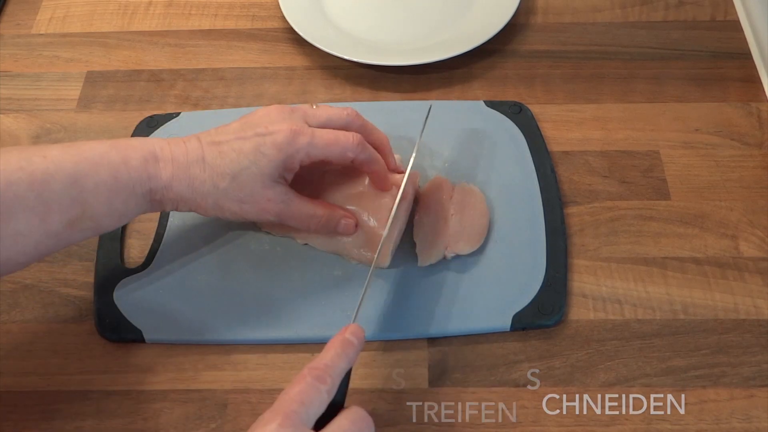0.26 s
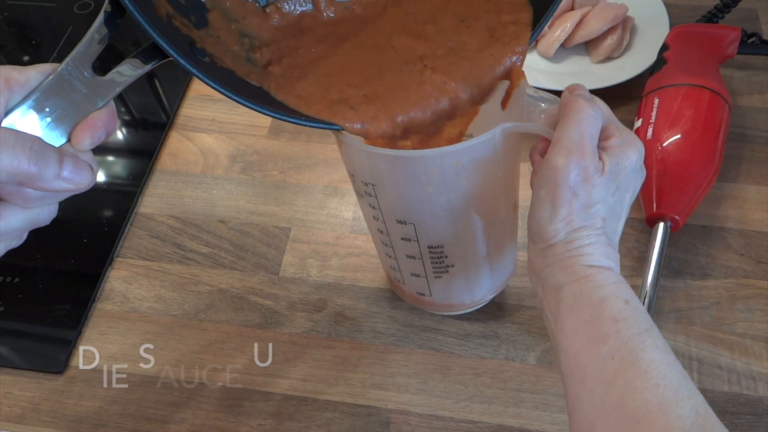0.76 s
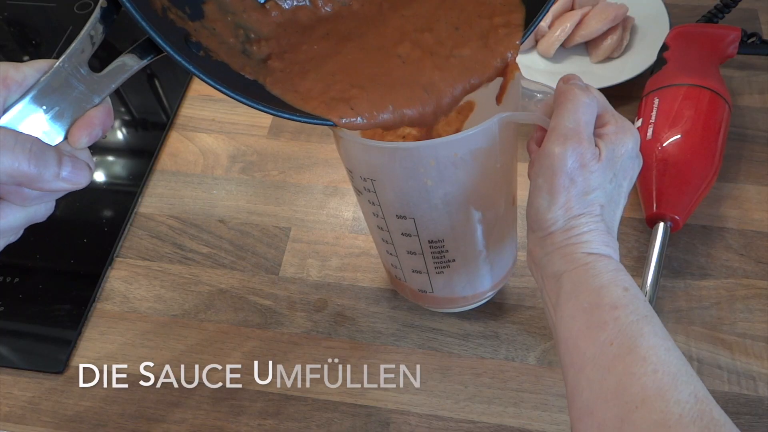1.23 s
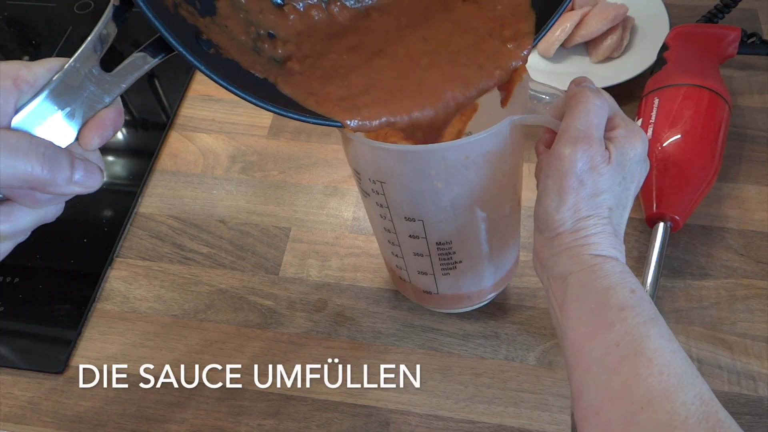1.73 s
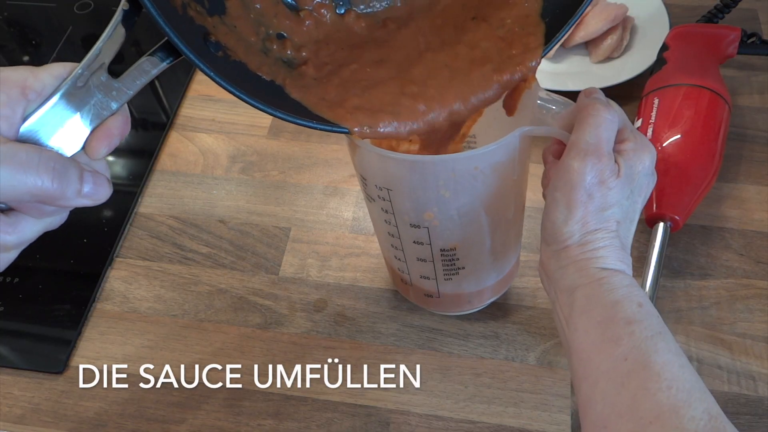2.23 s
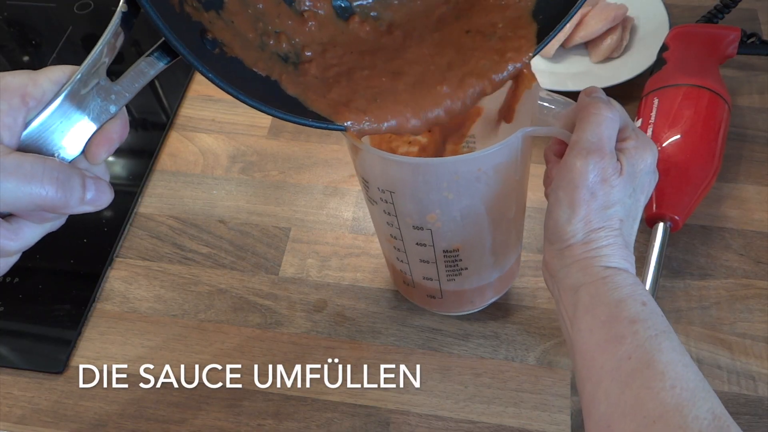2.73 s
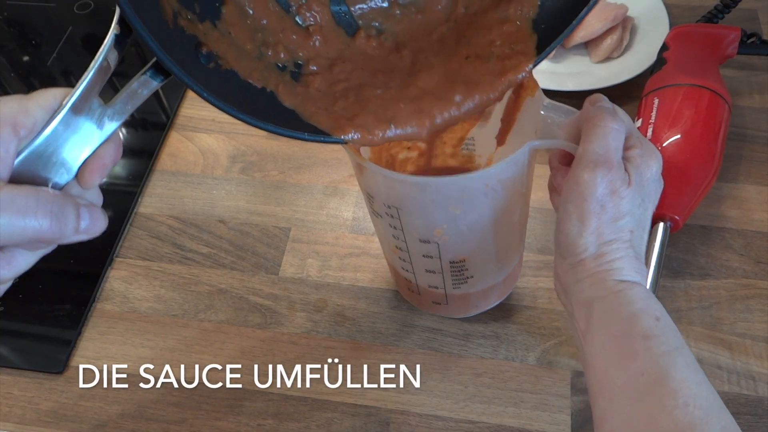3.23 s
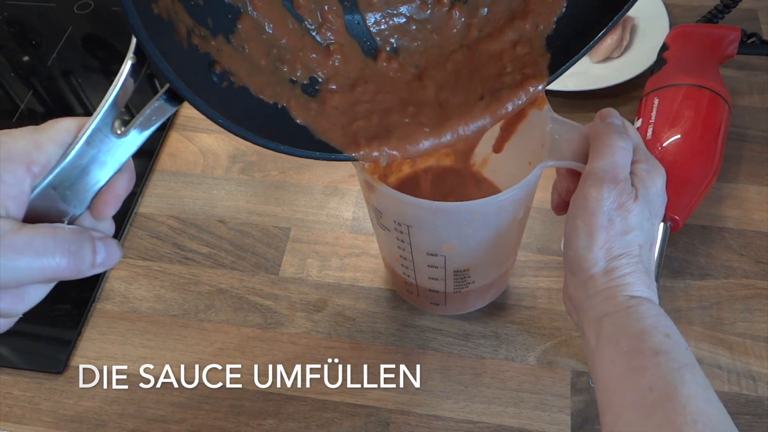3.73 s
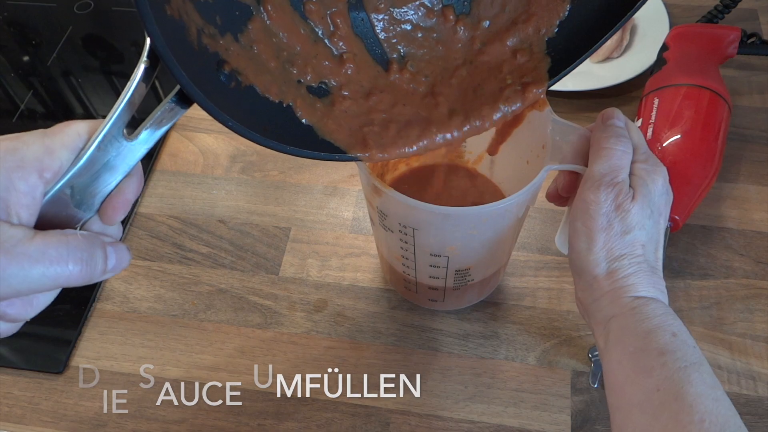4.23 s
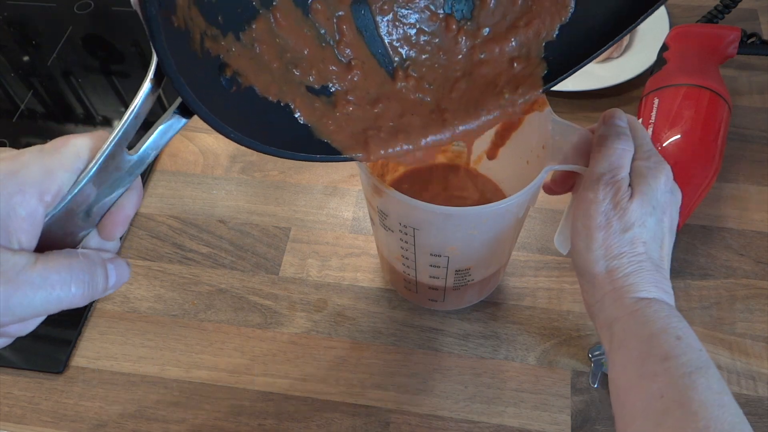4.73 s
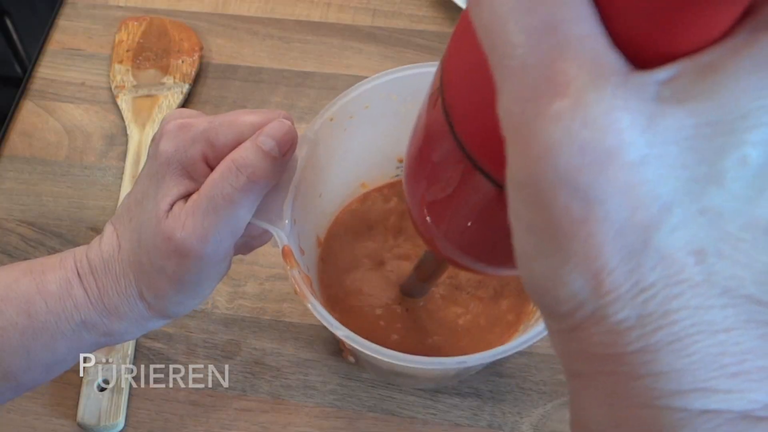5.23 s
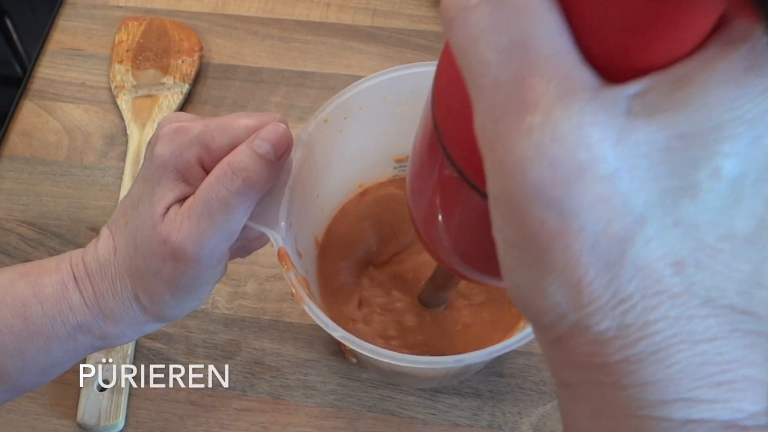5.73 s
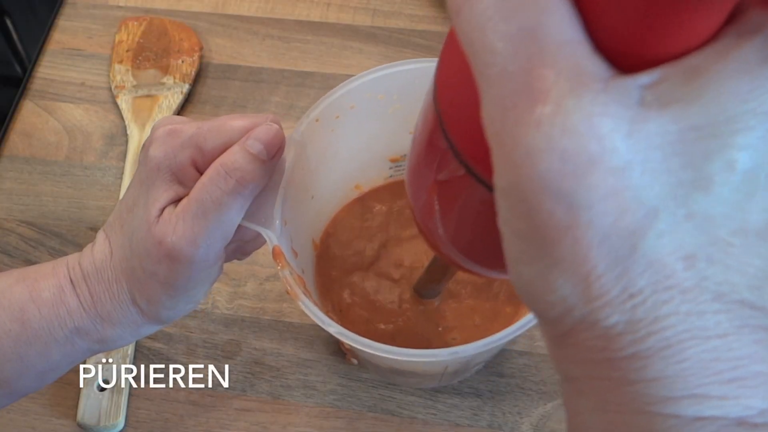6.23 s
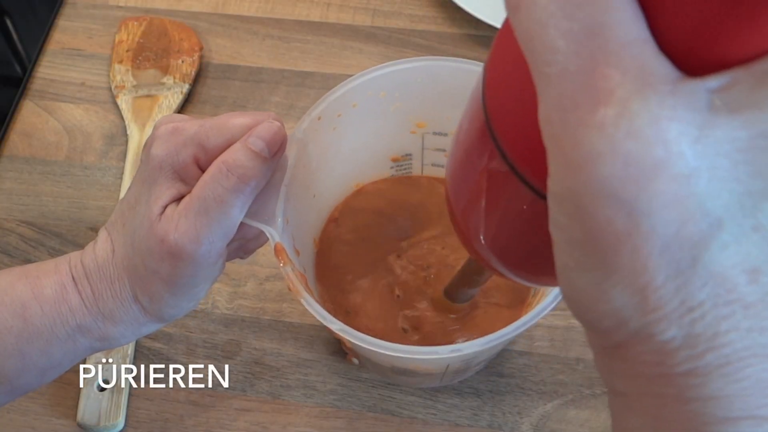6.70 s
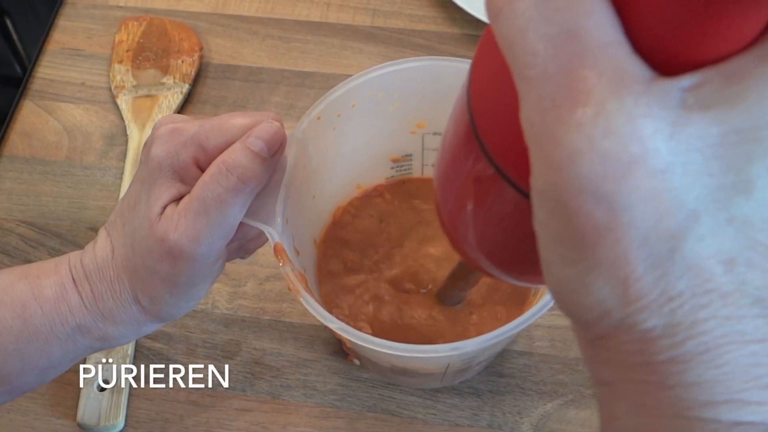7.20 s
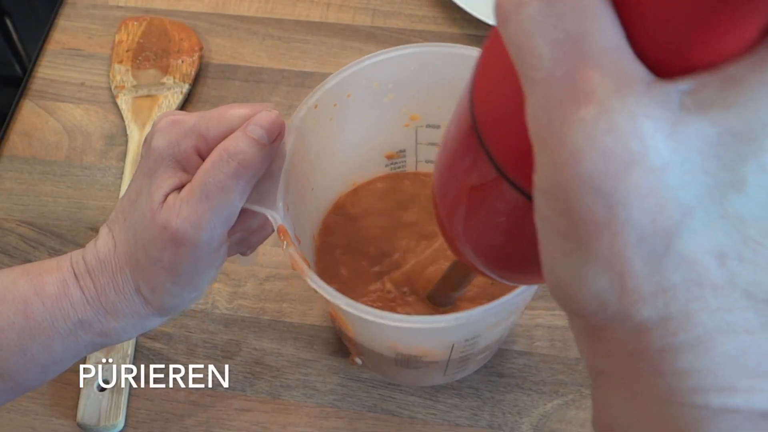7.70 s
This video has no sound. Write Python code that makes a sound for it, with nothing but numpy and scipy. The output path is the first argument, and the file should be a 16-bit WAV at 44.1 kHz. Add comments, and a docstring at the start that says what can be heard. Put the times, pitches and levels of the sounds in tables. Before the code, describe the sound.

A knife softly hisses through meat, thick sauce plops and spatters into a plastic jug, then a loud hand blender abruptly whirs until the end.

```python
"""A knife slides through meat on a cutting board: wet hiss, rubbing and a faint tick are shaped noise.
Thick sauce then drops from a pan into a plastic jug: torn films are noise bursts, air pockets and the pan decaying sines.
Last, a hand blender starts in the jug: filtered clicks churn, rasp and spatter, tones locked to the shaft whine,
and the jug bumps the worktop. All this is heard at arm's length in a small kitchen, with quiet room noise and low tones."""
import sys
import numpy as np
from scipy import signal
from scipy.fft import rfft, irfft
from scipy.io import wavfile
from scipy.ndimage import uniform_filter1d

SR = 44100
rng = np.random.default_rng(int(sys.argv[2]) if len(sys.argv) > 2 else 0)


def store_pcm(level_fs):
    """Save levels as 16-bit WAV."""
    pcm = np.round(np.clip(level_fs, -1, 1) * 32767).astype(np.int16)
    wavfile.write(sys.argv[1], SR, np.atleast_2d(pcm).T)


N = 351036
T = np.arange(N) / SR


def undb(db):
    """Logarithmic level: decibels become an amplitude gain."""
    return 10 ** (np.asarray(db) / 20)


def unit(x):
    """Normalisation: scale to rms 1."""
    return x / np.sqrt(np.mean(x ** 2))


def curves(table):
    """Linear interpolation: each column of a table becomes a line through time."""
    s, *columns = np.transpose(table)
    return [np.interp(T, s, column) for column in columns]


def add(out, s, sound):
    """Superposition: mix a short sound in at time s."""
    i = int(s * SR)
    out[i:i + len(sound)] += sound[:N - i]


def band(x, lo_hz, hi_hz, order=2):
    """Band limitation by a Butterworth band-pass."""
    edges = [lo_hz, min(hi_hz, SR / 2.2)]
    return signal.sosfilt(signal.butter(order, edges, "band", fs=SR, output="sos"), x)


def colour(x, points):
    """Minimum-phase filtering: a causal filter through (Hz, dB) points, from the cepstrum of the gain."""
    size = 2 ** 12
    hz, db = np.transpose(points)
    bin_hz = np.arange(size // 2 + 1) * SR / size
    gain = undb(np.interp(np.log(bin_hz + 1), np.log(hz), db))
    # folding the cepstrum onto positive times makes the filter causal
    cepstrum = irfft(np.log(gain))[:size // 2]
    cepstrum[1:] *= 2
    impulse = irfft(np.exp(rfft(cepstrum, size)))
    return signal.fftconvolve(x, impulse)[:len(x)]


def fade(t, t60):
    """Exponential damping: 60 dB lost in t60 seconds."""
    return np.exp(-np.log(1000) * t / t60)


def ring(modes, t):
    """Modal superposition: damped sines after one blow."""
    return sum(undb(db) * np.sin(2 * np.pi * hz * t) * fade(t, t60) for hz, db, t60 in modes)


def resonate(x, modes):
    """Driven resonance: x excites narrow modes, each as wide as its decay time makes it."""
    out = 0
    for hz, db, t60 in modes:
        half_width_hz = np.log(1000) / (2 * np.pi * t60)
        out = out + undb(db) * unit(band(x, hz - half_width_hz, hz + half_width_hz))
    return unit(out)


def walk(rate):
    """Random modulation: stepped noise, rate steps a second, smoothed twice to rms near 1."""
    k = int(SR / rate)
    steps = np.repeat(rng.standard_normal(N // k + 1), k)
    return unit(uniform_filter1d(uniform_filter1d(steps, k), k)[:N])


def clicks(rate, spread_db):
    """Shot noise: random clicks of uneven size and either sign, rate a second."""
    size = undb(spread_db * np.minimum(rng.exponential(size=N), 5))
    return (rng.random(N) < rate / SR) * size * rng.choice([-1, 1], N)


def blow(x, db):
    """Onset level: give the first 10 ms of a hit the rms level db."""
    return x * undb(db) / np.sqrt(np.mean(x[:SR // 100] ** 2))


def splat(t, lo_hz, hi_hz, t60):
    """Broadband impulse: a decaying noise burst limited to one band."""
    return band(rng.standard_normal(len(t)) * fade(t, t60), lo_hz, hi_hz)


def stroke(s, attack, t60):
    """Attack and decay: an envelope that rises to its peak at time s and dies away."""
    return np.clip(1 + (T - s) / attack, 0, 1) * fade(np.maximum(T - s, 0), t60)


def kitchen(x, t60, wet_db, side_db):
    """Reverberation: direct sound plus a tail from tiles and cupboards, part alike, part opposite left and right."""
    t = T[:SR // 2]
    shape = fade(t, t60) * np.clip((t - .002) / 0.00099, 0, 1)
    mid, side = (band(rng.standard_normal(len(t)), 195, 7400, order=1) * shape for _ in range(2))
    mid, side = (tail / np.sqrt(np.sum(tail ** 2)) for tail in (mid, side))
    side = colour(side, [(300, -6.0), (700, -3.5), (1400, -0.5), (2500, -7), (5000, -14.5), (9000, 2.0)])
    tails = undb(wet_db) * mid + undb(side_db) * side * np.array([[1], [-1]])
    return x + signal.fftconvolve(x[None], tails, axes=1)[:, :N]


def placed(x, pan_db):
    """Interaural level difference: pan_db is left minus right."""
    return x * undb(np.array([[pan_db], [-pan_db]]) / 2)


# spectrum of the quiet kitchen: pitch_hz [Hz], level_db [dB, relative]
HUSH_SPECTRUM = [(25, 6), (50, -12), (85, 0), (130, -5), (180, 0), (260, -3.5), (370, -4), (530, -8.5),
                 (1000, -12.5), (3300, -22.5), (5400, -22), (11000, -31)]
HUSH_DB, HUSH_WANDER_DB = -60, 0.54


def hush():
    """Diffuse background: low room noise, nearly steady, from two independent coloured noises."""
    mid, side = (unit(colour(rng.standard_normal(N), HUSH_SPECTRUM)) for _ in range(2))
    level = undb(HUSH_DB + HUSH_WANDER_DB * walk(6.3))
    return level * (mid + 0.74 * side * np.array([[1], [-1]]))


# pushes of the knife through the meat: start_s [s, moment of the peak], level_db [dB, wet hiss]
KNIFE_PUSHES = [(.015, -61.5), (.1, -66), (.24, -63), (.52, -57.5), (.58, -51.5)]
CUT_ATTACK_S, CUT_T60_S = 0.038, 0.37
# the edge reaches the board and rubs along it; RUB_S is the peak
RUB_S, RUB_DB, RUB_ATTACK_S, RUB_T60_S = 0.461, -51, .025, 0.8


def knife():
    """Friction as shot noise: the blade parts wet meat and its edge rubs along the board."""
    hiss = unit(band(clicks(2500, spread_db=1.5), 3800, 9900, order=1))
    pushes = sum(undb(db) * stroke(s, CUT_ATTACK_S, CUT_T60_S) for s, db in KNIFE_PUSHES)
    rub = unit(band(clicks(1200, spread_db=5.0), 260, 505, order=4))
    return hiss * pushes + rub * undb(RUB_DB) * stroke(RUB_S, RUB_ATTACK_S, RUB_T60_S)


# as the jug fills, its air column shortens and each splash dies sooner
FILL_FROM_S, FILL_TO_S = 1.45, 3.6
EMPTY_RATIO, FULL_RATIO = 1.027, 1.17  # factor on the air column's pitches
EMPTY_T60_S, FULL_T60_S = 0.07, 0.023  # splash decay


def filling(s, empty, full):
    """Changing cavity: a quantity moves from its empty-jug to its full-jug value as the sauce rises."""
    return np.interp(s, [FILL_FROM_S, FILL_TO_S], [empty, full])


# short bright ticks, a faint one of the knife in the meat at .431 s, then wet films bursting:
# start_s [s], centre_hz [Hz], tick_db [dB], slap_db [dB]
BRIGHT_TICKS = [(.431, 6900, -55.5, -59.5), (.647, 7400, -37, -58), (0.865, 8200, -39.5, -54),
                (1.034, 7760, -44.5, -57), (1.165, 5140, -47, -53), (1.189, 7100, -37, -42.5),
                (1.327, 6360, -40, -33), (1.603, 6130, -38.5, -54), (1.748, 6740, -49, -50),
                (2.088, 8000, -35, -62), (2.253, 8000, -44, -70), (2.373, 7300, -40.5, -67),
                (2.578, 7960, -47, -63), (2.642, 7150, -45, -37), (2.725, 8050, -30, -52),
                (3.137, 7940, -30, -40.5), (3.46, 7600, -32, -54), (3.834, 8100, -30.5, -54),
                (3.929, 7440, -39.5, -61), (4.692, 7240, -47, -61), (4.797, 6640, -48, -52)]


def ticks():
    """Impulsive release: the knife's tick, then each film burst, is a high tick over a broader, lower slap."""
    out, t = np.zeros(N), T[:SR // 6]
    for s, hz, tick_db, slap_db in BRIGHT_TICKS:
        tick = splat(t, hz * 0.88, hz * 1.21, filling(s, EMPTY_T60_S, FULL_T60_S))
        slap = splat(t, 2000, 6200, t60=0.058)
        add(out, s, blow(tick, tick_db) + blow(slap, slap_db))
    return out


# air modes of the jug: pitch_hz [Hz, before the fill ratio], level_db [dB, relative, before scatter], t60_s [s]
JUG_AIR_MODES = [(593, 19.5, 0.043), (553, -37, .04), (734, 2.5, .04), (1180, -7, .05)]
JUG_SCATTER_DB, THUD_DB = 4, -5  # thud against the air column
POCKET_CYCLES, TEAR_CYCLES, TEAR_DB = 95, 70, 0  # cycles of the pocket per 60 dB decay; dB against the pocket
# a lump slaps bare plastic harder than sauce (dB against its pocket)
SLAP_EMPTY_DB, SLAP_FULL_DB = -1.5, -8.5


def plop(s, hz, pocket_db, jug_db, spray_db):
    """Bubble and cavity resonance: a lump slaps, traps a ringing air pocket, sounds the jug and throws spray."""
    t = T[:SR // 6]
    # the pocket rises in pitch as it opens to the surface
    tone = np.sin(2 * np.pi * hz * (t + 0.11 * t ** 2)) * fade(t, POCKET_CYCLES / hz)
    tear = splat(t, hz * 0.72, hz * 1.206, TEAR_CYCLES / hz)
    pocket = blow(tone, pocket_db) + blow(tear, pocket_db + TEAR_DB)
    # each lump lands somewhere else and favours other modes, over a dull thud
    ratio = filling(s, EMPTY_RATIO, FULL_RATIO)
    modes = [(mode_hz * ratio, db + JUG_SCATTER_DB * rng.standard_normal(), t60)
             for mode_hz, db, t60 in JUG_AIR_MODES]
    air = band(ring(modes, t), 360, 3000, order=1)
    thud = splat(t, 530, 1640, t60=0.17)
    jug = blow(air, jug_db) + blow(thud, jug_db + THUD_DB)
    slap_db = pocket_db + filling(s, SLAP_EMPTY_DB, SLAP_FULL_DB)
    slap = blow(splat(t, 3070, 5200, t60=0.034), slap_db)
    spray = blow(splat(t, 6470, 9260, filling(s, EMPTY_T60_S, FULL_T60_S)), spray_db)
    return pocket + jug + slap + spray


# flow of the running sauce: start_s [s], level_db [dB, reference for crackle and drips]
SAUCE_FLOW = [(0.55, -47), (0.75, -45.5), (1.18, -59), (1.98, -46.5), (3.04, -59.5), (3.38, -55.5),
              (3.45, -57.5), (4.51, -71), (4.8, -73)]
POUR_S, POUR_END_S = .56, 4.8
CRACKLE_DB, DRIP_DB = -7, -4.5  # against the flow
DRIPS_PER_S, DRIP_HZ, DRIP_SPREAD, DRIP_SCATTER_DB = 16, 2000, .3, 3  # spread in log pitch
DRIP_JUG_DB, DRIP_SPRAY_DB = -7, 3.5  # against the drip's pocket


def stream():
    """Random superposition: the running sauce crackles and sheds small drips, both following its flow."""
    flow_db, = curves(SAUCE_FLOW)
    crackle = colour(clicks(1000, spread_db=3.5), [(300, -7.0), (650, 2.5), (2000, -18.5), (3500, -5),
                                                   (5500, -1), (8000, 2.0), (11000, -6.0)])
    out = unit(crackle) * undb(flow_db + CRACKLE_DB) * (T > POUR_S)
    count = int(DRIPS_PER_S * (POUR_END_S - POUR_S))
    for when, size, strength in rng.uniform(-0.92, 1, (count, 3)):
        s = np.interp(when, [-1, 1], [POUR_S, POUR_END_S])
        hz = DRIP_HZ * np.exp(DRIP_SPREAD * size)
        db = np.interp(s, T, flow_db) + DRIP_DB + DRIP_SCATTER_DB * strength
        add(out, s, plop(s, hz, db, db + DRIP_JUG_DB, db + DRIP_SPRAY_DB))
    return out


# big lumps of sauce landing: start_s [s], pitch_hz [Hz, air pocket], pocket_db [dB],
# jug_db [dB, air column], spray_db [dB]
LUMPS = [(.608, 1630, -41.5, -28, -47), (.639, 2330, -41, -44, -47), (.731, 1804, -29.5, -42, -35),
         (.803, 1690, -41, -59, -56), (.972, 1850, -54, -63, -47), (1.337, 1204, -35.5, -47, -37),
         (1.484, 2410, -45, -74, -40), (1.711, 2570, -51.5, -69, -44.5), (1.794, 2460, -43, -50, -42.5),
         (1.863, 2570, -40, -47.5, -43), (1.985, 1840, -40, -47, -43), (2.014, 1840, -47, -48, -37),
         (2.051, 1870, -37, -44, -45), (2.076, 1780, -42.5, -41.5, -46), (2.158, 1840, -38, -42.5, -37),
         (2.414, 1107, -39, -45, -41), (2.646, 2020, -52, -51.5, -35.5), (2.665, 1120, -47, -51, -58),
         (2.938, 2610, -38.5, -47.5, -40.5), (3.174, 1150, -38, -39.5, -57),
         (3.195, 2250, -38.5, -43.5, -44), (3.226, 2400, -46, -53, -50), (3.293, 2476, -36.5, -39.5, -34),
         (3.692, 2240, -51, -50.5, -38), (3.724, 1884, -40.5, -48, -34), (3.8, 2120, -42, -48.5, -39),
         (3.874, 1700, -41, -46, -43), (4.297, 2150, -48.5, -51.5, -41.5)]


def lumps():
    """Impact excitation: big lumps land in the jug one after another."""
    out = np.zeros(N)
    for s, *lump in LUMPS:
        add(out, s, plop(s, *lump))
    return out


# modes of the pan: pitch_hz [Hz], level_db [dB, relative], t60_s [s]
PAN_MODES = [(1735, 0, 0.49), (2410, 0, 0.2), (2520, -2, .18)]
PAN_S, PAN_DB = .731, -42


def pan():
    """Free modal vibration: the pan rings softly once as its rim touches the jug."""
    out = np.zeros(N)
    add(out, PAN_S, undb(PAN_DB) * ring(PAN_MODES, T[:SR // 2]))
    return out


# faint low tones in the room: middle_s [s], pitch_hz [Hz], level_db [dB, before MOAN_LIFT_DB], length_s [s]
LOW_TONES = [(1.7, 322, -73, .35), (2.5, 153.5, -73, .5), (3.482, 318, -72, .26), (4.04, 321, -69, .13),
             (4.474, 375, -77, .25)]
MOAN_LIFT_DB = 12


def moans():
    """Amplitude modulation: barely audible low sines swell and fade."""
    out = np.zeros(N)
    for s, hz, db, length in LOW_TONES:
        t = T[:int(length * SR)]
        tone = np.hanning(len(t)) * np.sin(2 * np.pi * hz * t)
        add(out, s - length / 2, undb(db + MOAN_LIFT_DB) * tone)
    return out


# spectrum of the churning sauce: pitch_hz [Hz], level_db [dB, relative]
CHURN_SPECTRUM = [(30, -30), (62, -39), (88, -25.5), (125, -25), (170, -14.5), (230, -21), (310, -11.5),
                  (370, -9), (450, -4.5), (690, 3.5), (1020, -1), (1200, -4.5), (1600, -17), (2600, -30.5)]
# narrow resonances of the kitchen and jug that colour the churn:
# pitch_hz [Hz], level_db [dB, relative], t60_s [s]
KITCHEN_JUG_MODES = [(85, -20, .2), (145, -18, .15), (253, -15, .2), (310, -10, .08), (418, -5, .11),
                     (460, 1, .14), (532, -2, .12), (551, -2, .13), (613, -2, .12), (666, 2, .06),
                     (709, 1, .13), (766, 1, .08), (820, -1, .12), (862, -5, .13), (916, 1, .11),
                     (985, -1, .11), (1142, -8, .1), (1262, -7, .1), (1480, -3, .05)]


def churn(mains):
    """Turbulence and driven resonance: eddies shake the sauce; kitchen and jug resonances colour it."""
    eddies = clicks(6000, spread_db=2.0) * (1 + 0.023 * mains)
    return unit(colour(eddies, CHURN_SPECTRUM)) + .8 * resonate(clicks(5000, spread_db=2), KITCHEN_JUG_MODES)


# spectrum of the motor housing: pitch_hz [Hz], level_db [dB, relative]
HOUSING_SPECTRUM = [(500, -45.5), (1200, -12), (1450, -0.5), (1570, -5), (1700, -2.5), (1820, -1),
                    (2030, 2.5), (2270, 3), (2540, -9), (2800, -10.5), (3300, -10), (4500, -43.5)]
# narrow resonances of the kitchen and blender that colour the rasp:
# pitch_hz [Hz], level_db [dB, relative], t60_s [s]
KITCHEN_BLENDER_MODES = [(1690, -6, .06), (1948, -3, .1), (2013, 1, .1), (2050, -1, .09), (2135, 0, .06),
                         (2225, -4, .06), (2441, -6, .09), (2602, -10, .09), (2830, -7, .06),
                         (3035, -7, .06), (3370, -10, .05)]


def rasp(turn, mains):
    """Modulated shot noise: brushes and bearings rattle the housing, strongest once a turn."""
    rattle = clicks(7000, spread_db=2) * (1 + .12 * np.cos(turn) + .12 * mains)
    resonance = resonate(clicks(5000, spread_db=2), KITCHEN_BLENDER_MODES)
    return unit(colour(rattle, HOUSING_SPECTRUM)) + .5 * resonance


# spectrum of the blades cutting the sauce: pitch_hz [Hz], level_db [dB, relative]
SPATTER_SPECTRUM = [(1500, -26), (2600, 4.5), (3050, 3), (3400, 2.5), (3550, -2.5), (3800, 2.5), (4200, -3),
                    (4550, -4), (5000, -11.5), (6600, -10.5), (7200, -15), (8900, -13.5), (9400, -28),
                    (9950, -15.5), (10600, -42)]


def spatter(turn):
    """Cavitation: cavities collapsing behind the blades crowd on one side of each turn."""
    crowding = 1 + .22 * np.cos(turn) + .15 * np.cos(6 * turn)
    cavities = clicks(8000, spread_db=2.8) * crowding * undb(.7 * walk(25))
    return unit(colour(cavities, SPATTER_SPECTRUM))


# commutator whine: shaft_order [multiple of the shaft rate], level_db [dB, relative]
WHINE_ORDERS = [(16, 6), (32, 5), (48, 1.5), (64, 2.5)]
WHINE_FLUTTER_DB = 1.5


def whine(turn):
    """Harmonic orders with phase modulation: an out-of-round commutator puts side tones around each order."""
    phase = turn + .012 * np.sin(turn)
    out = np.zeros(N)
    for order, db in WHINE_ORDERS:
        out += undb(db + WHINE_FLUTTER_DB * walk(60)) * np.sin(round(order) * phase)
    return out


# motor under load: start_s [s], bar_hz [Hz, commutator bars passing], level_db [dB, gain on the whine orders]
MOTOR_SPEED = [(4.87, 2205, -39), (4.89, 2204, -50), (5.82, 2270, -41.5), (5.92, 2175, -54),
               (5.97, 2240, -62), (6.56, 2213, -42), (6.61, 2241, -40.5), (6.92, 2218, -44),
               (7.04, 2237, -46), (7.28, 2246, -54), (7.77, 2257, -42), (7.81, 2166, -43),
               (7.86, 2170, -49), (7.96, 2139, -41)]
# the blades draw more air as they are lifted: start_s [s], level_db [dB, blade spatter before SPATTER_LIFT_DB]
BLADE_LIFT = [(4.9, -28.5), (4.92, -25.5), (5.14, -28.5), (5.46, -26.5), (5.62, -30.5), (5.92, -24.5),
              (6.35, -29.5), (7.12, -25.5), (7.25, -26.5), (7.74, -25), (7.9, -28), (7.95, -29)]
START_S, SPIN_UP_S, BARS = 4.861, 0.011, 16  # bars: commutator bars a turn
TREMBLE_SLOW, TREMBLE_FAST = .0025, .005  # fraction of the speed
CHURN_DB, CHURN_PER_SPATTER, CHURN_WANDER_DB = -21.5, -0.34, 0.54  # less sauce is churned while air is drawn
RASP_DB, RASP_WANDER_DB, SPATTER_LIFT_DB = -18.5, 1.16, 2
HUM_DB, HUM_WANDER_DB = -61, 3


def blender():
    """Rotating-machine noise: churn, rasp, spatter and whine share one shaft under a changing load."""
    bar_hz, whine_db = curves(MOTOR_SPEED)
    shaft_hz = bar_hz / BARS
    spatter_db, = curves(BLADE_LIFT)
    extra_spatter_db = spatter_db - np.mean(spatter_db[T > START_S])
    churn_db = CHURN_DB + CHURN_PER_SPATTER * extra_spatter_db + CHURN_WANDER_DB * walk(7.6)
    rasp_db = RASP_DB + RASP_WANDER_DB * walk(8)
    # lumps passing the blades make the speed tremble
    tremble = 1 + TREMBLE_SLOW * walk(60) + TREMBLE_FAST * walk(500)
    turn = 2 * np.pi * np.cumsum(shaft_hz * tremble) / SR
    # the motor's torque pulses at twice the mains frequency
    mains = np.cos(2 * np.pi * 100 * T)
    sound = churn(mains) * undb(churn_db)
    sound += rasp(turn, mains) * undb(rasp_db)
    sound += spatter(turn) * undb(spatter_db + SPATTER_LIFT_DB)
    sound += whine(turn) * undb(whine_db)
    # the shaft's slight unbalance hums once a turn
    sound += undb(HUM_DB + HUM_WANDER_DB * walk(3)) * np.sin(turn)
    return sound * np.sqrt(np.clip((T - START_S) / SPIN_UP_S, 0, 1))


# the jug bumping the worktop: start_s [s], level_db [dB, gain on the thud modes]
JUG_BUMPS = [(5.82, -42), (6.932, -41), (7.601, -38)]


def bumps():
    """Low-frequency impact modes: the blender foot nudges the jug on the worktop, a soft, deep thud."""
    out, t = np.zeros(N), T[:SR // 2]
    for s, db in JUG_BUMPS:
        add(out, s, undb(db) * ring([(42, -9, .3), (85.5, 7.5, 0.16), (103, -4, .25)], t))
    return out


SAUCE_PAN_DB, BLENDER_PAN_DB = -0.5, -0.53  # left minus right


def scene():
    """Superposition of sources: knife, pouring and blender slightly to the right, over the quiet room."""
    sources = knife() + ticks() + stream() + lumps() + pan()
    sauce = kitchen(sources, t60=0.31, wet_db=-7.5, side_db=-13)
    machine = kitchen(blender() + bumps(), t60=.3, wet_db=-15, side_db=-13)
    return placed(sauce, SAUCE_PAN_DB) + placed(machine, BLENDER_PAN_DB) + hush() + moans()


TOP_HZ = 11000


def record(dry):
    """Band limits and saturation: the camera cuts the deep bass, rounds the highest peaks and cuts the top."""
    lean = signal.sosfilt(signal.butter(2, 40, "high", fs=SR, output="sos"), dry)
    rounded = np.tanh(0.68 * lean) / 0.72
    return signal.sosfilt(signal.ellip(12, .2, 70, TOP_HZ, fs=SR, output="sos"), rounded)


dry = scene()
out = record(dry)
store_pcm(out)
```